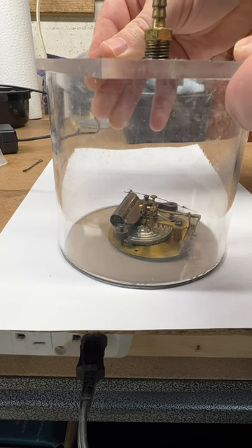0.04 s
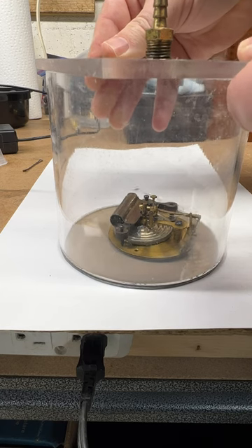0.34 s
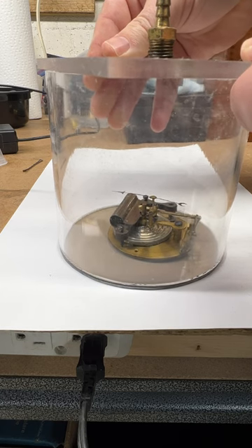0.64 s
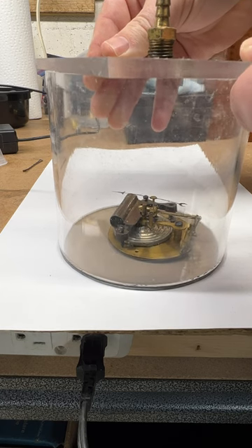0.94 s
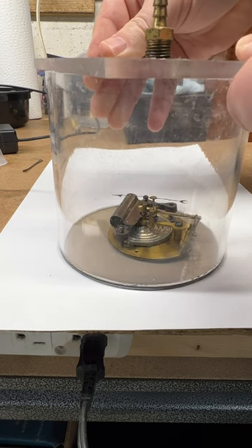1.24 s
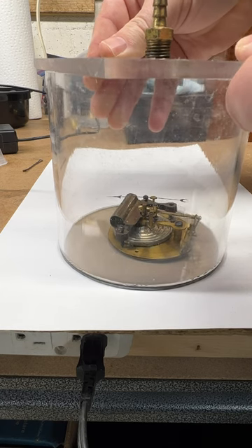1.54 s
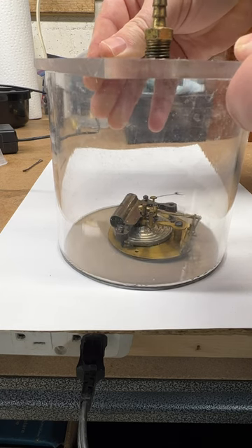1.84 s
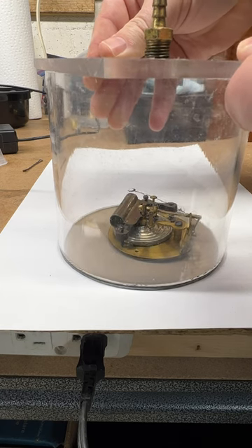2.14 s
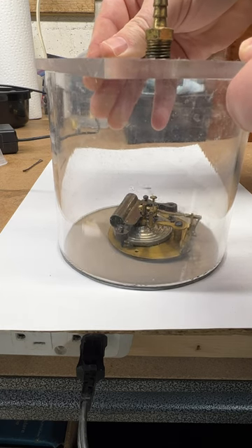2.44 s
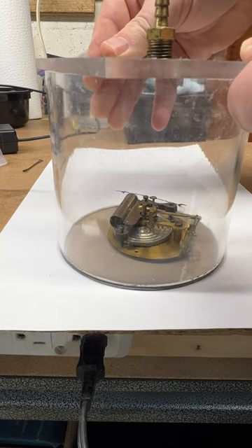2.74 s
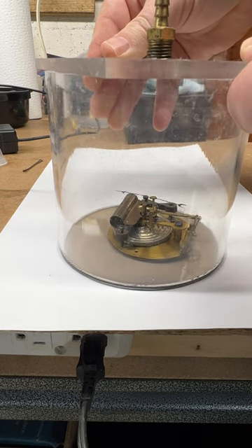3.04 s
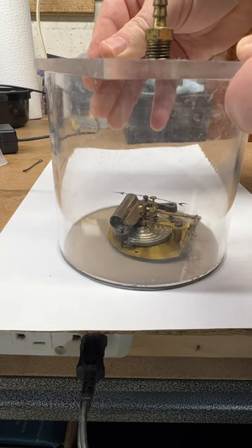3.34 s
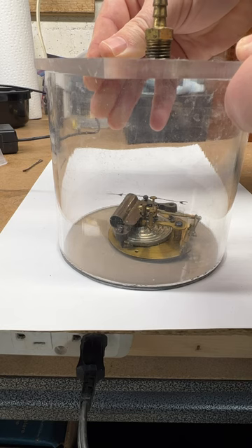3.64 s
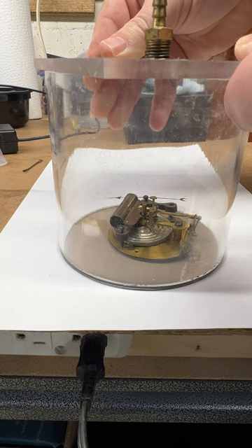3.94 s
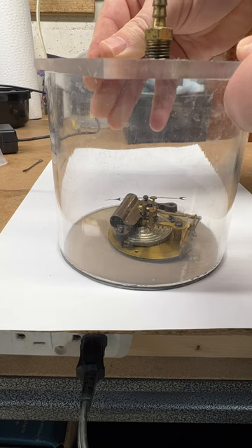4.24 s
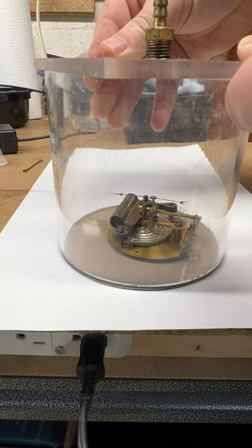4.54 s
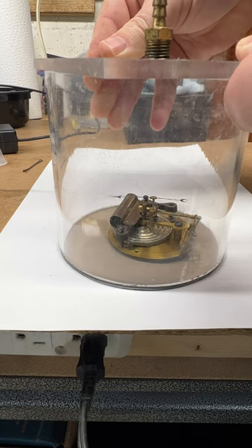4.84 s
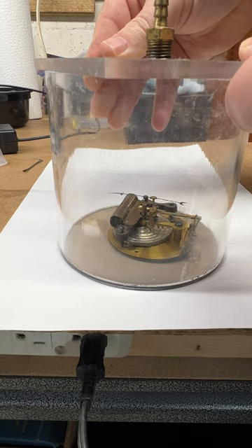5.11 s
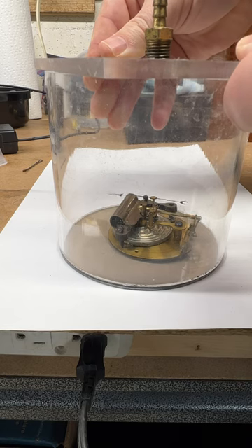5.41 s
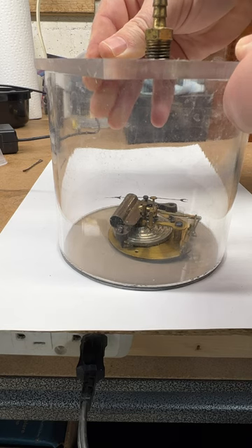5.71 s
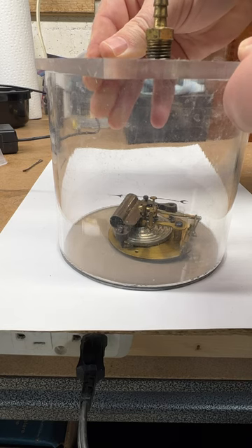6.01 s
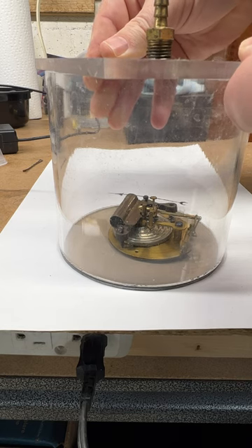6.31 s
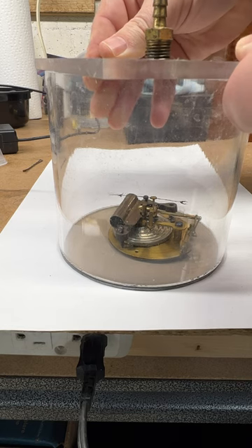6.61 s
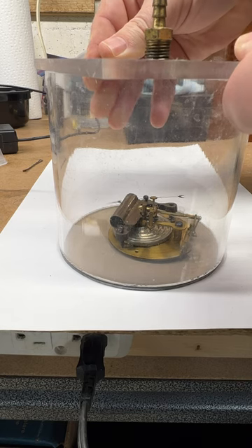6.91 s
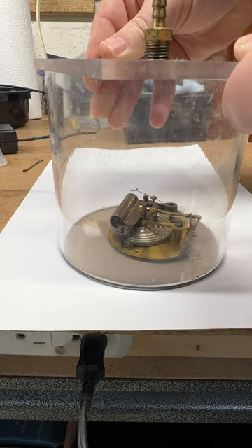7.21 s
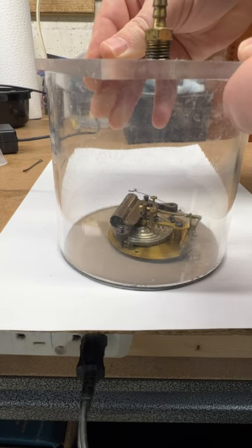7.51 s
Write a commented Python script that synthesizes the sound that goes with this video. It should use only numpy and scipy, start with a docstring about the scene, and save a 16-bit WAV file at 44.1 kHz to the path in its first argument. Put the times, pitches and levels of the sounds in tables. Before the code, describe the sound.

A rotary vacuum pump runs without a break in a small workshop, its low motor drone carrying rapid valve clacks, churning oil and a bright hiss. It starts out labouring and knocking, quickly eases, then strains again with a squelchy rattle around two seconds in. A long, smoother run with a faint thin whistle follows, before the hard knocking returns at the end. The sound is close and fairly dry.

```python
"""A rotary vacuum pump drones in a small workshop, emptying a jar. It opens labouring, dragging a little
and knocking hard, then eases within half a second into its free run: each shaft turn brings pressure
surges, valve clacks and two hissing vane sweeps, over churning oil and a thin whistle that now and then
chirps. The load builds again to 2.2 s, squelching oil and whipping up fizz, and lets go. A light spell
passes at 4.1 s, and a last hard one peaks at 7.2 s and holds to the end."""
import sys
import numpy as np
from scipy import signal
from scipy.fft import rfft, irfft, next_fast_len
from scipy.io import wavfile
from scipy.ndimage import map_coordinates

SR = 44100
rng = np.random.default_rng(int(sys.argv[2]) if len(sys.argv) > 2 else 0)


def unload_audio(sound):
    """Save the sound as a 16-bit wav file, at the path given as the first command line argument."""
    columns = np.transpose(np.atleast_2d(sound))
    # keep every value between -1 and 1, then stretch to whole-number steps
    steps = np.round(np.clip(columns, -1, 1) * 32767)
    wavfile.write(sys.argv[1], SR, steps.astype(np.int16))


N = 333396
FREE_HZ = 29.211  # shaft speed with no load

# pressure surges, negative for suction: (place [turns], free push [relative], labouring push [relative])
PRESSURE_SURGES = [(.22, .8, .65), (.372, -.35, -.4), (.467, -.58, -.8), (.55, -.7, -.8), (.592, .12, .1),
                   (.683, .52, .2), (.825, .27, .3)]
# body of the drone, before gain and tilt: (shaft order, free [dB], part load [dB], labouring [dB])
DRONE_PARTIALS = [(2, -30.0, -30.0, -30.0), (3, -48.5, -49.0, -48.0), (4, -40.0, -44.0, -49.5),
                  (5, -32.5, -33.0, -34.5), (6, -46.0, -39.5, -36.5), (7, -38.0, -41.5, -48.0),
                  (8, -37.5, -34.5, -33.5), (9, -42.0, -34.0, -33.0), (10, -30.0, -29.5, -28.5),
                  (11, -35.5, -42.5, -38.0), (12, -34.5, -33.0, -29.0), (13, -32.5, -34.5, -33.5),
                  (14, -40.5, -38.5, -36.5), (15, -47.5, -46.0, -42.5), (16, -32.0, -31.5, -33.0),
                  (17, -44.0, -42.5, -39.5), (18, -44.0, -43.0, -42.0), (19, -43.5, -42.5, -42.5),
                  (20, -41.0, -43.0, -41.5)]
def drone(turn, load, seat, gain_db=2.5, tilt_db=1.26, flutter=.035, free_chug=.06, hard_chug=.17):
    """Low shaft orders line up into the pressure surges of each turn; the upper ones carry the knock."""
    place, free_push, hard_push = np.transpose(PRESSURE_SURGES)
    chug = free_chug + (hard_chug - free_chug) * load
    knock = seat ** 0.72 * (1 + chug * np.cos(2 * np.pi * (turn - .47)))  # swells towards mid-turn
    body = np.zeros(N)
    for order, *levels_db in DRONE_PARTIALS:
        k = round(order)
        arrival = np.exp(-2j * np.pi * k * place)
        phase = np.angle((1 - load) * (free_push @ arrival) + load * (hard_push @ arrival))
        level = amp(under_load(load, *levels_db) + tilt_db * k / 20)
        level *= 1 + flutter * k / 10 * wobble(30)
        body += level * np.cos(2 * np.pi * k * turn + phase) * (knock if k > 6 else 1)
    return amp(gain_db) * body


def shaft(load, drag_hz=.045, lag_turns=.02, wander_turns=.0012):
    """Turns done so far: load slows the motor and makes the valve open later."""
    return np.cumsum(FREE_HZ - drag_hz * load) / SR - lag_turns * load + wander_turns * wobble(3)


# spells of labouring: (peak time [s], hold [s], build-up time constant [s], load [0-1])
LOAD_SPELLS = [(0, 0.3, 0.48, 0.94), (2.198, 0.17, 0.23, 0.94), (4.082, 0.054, 0.075, 0.25),
               (7.193, 0.44, .19, 0.95)]
def labour(release_s=0.13):
    """The load on the pump, 0-1: in each spell it builds ever faster, holds, then lets go."""
    t = np.arange(N) / SR
    load = np.zeros(N)
    for peak, hold, creep, size in LOAD_SPELLS:
        build = np.exp(np.minimum(t - peak, 0) / creep)
        release = np.clip(1 - (t - (peak + hold)) / release_s, 0, 1)
        load += size * build * release
    return np.clip(load, 0, 1)


# turns where the knock fails, slams or drags: (time [s], accent [dB], delay [turns])
KNOCK_STUMBLES = [(.02, -4, 0), (.09, 1, 0), (.12, -2, 0), (.22, -3, 0), (.29, 1, 0), (.36, -8, .004),
                  (.53, -4, 0), (.94, -3, 0), (1.01, -7, .004), (1.42, -8, .004), (1.66, -9, 0),
                  (1.8, -4, .004), (1.83, -4, 0), (1.97, 4, 0), (2.0, -4, .006), (2.07, -6, .004),
                  (2.14, 2, 0), (2.21, -6, .004), (2.25, -2, 0), (2.28, 1, 0), (2.31, 1.5, 0),
                  (2.42, -2, .008), (2.45, -1, .014), (2.48, -3, .018), (2.62, -3, 0), (3.03, -7, .005),
                  (3.68, -3, .008), (4.09, -7, 0), (4.57, -7, .005), (5.43, -3, 0), (5.77, -2, 0),
                  (6.87, -7, .004), (6.93, -7, .008), (7.0, -5, 0), (7.11, -7, .008), (7.14, -4, .006),
                  (7.24, 1, 0), (7.31, -2, 0), (7.45, -3, 0), (7.48, -2, 0), (7.52, 1, 0)]
def seating(turn, scatter_db=.45, jitter_turns=.0012):
    """Gain and delay [turns] of the mid-turn knock: it varies each turn and now and then stumbles."""
    count = turn.astype(int)
    accent_db, late = rng.standard_normal((2, count[-1] + 1)) * [[scatter_db], [jitter_turns]]
    for time, db, delay in KNOCK_STUMBLES:
        which = count[min(round(time * SR), N - 1)]
        accent_db[which], late[which] = db, delay
    mid_turn = np.exp(-((turn % 1 - .54) / .14) ** 4)
    return amp(accent_db[count] * mid_turn), late[count] * mid_turn


# valve and vane hits, levels relative: (place [turns], free [dB], part load [dB], labouring [dB],
# brightness [dB/octave], timing scatter [turns], level scatter [dB])
CONTACTS = [(.172, -5.5, 2, 2.5, -2.5, .0005, .7), (.387, -20, -8, 2, -8, .001, 1),
            (.465, 1, 1.5, 4, -7, .0015, 1.3), (.53, -8, -6, -3, -8, .003, 1.6),
            (.6, -20, -14, -4, -6, .002, 1.6), (.683, -.5, 0, .5, -5, .001, 1.6)]
# each hit and the light valve's bounce after it: (typical delay [turns], relative level [dB])
BOUNCES = [(0, 0), (.022, -13)]
# ring of the casing: (frequency [Hz], width [Hz], relative level [dB])
CASING_MODES = [(735, 53, 2), (869, 11, 4), (1177, 470, 0), (1410, 80, 0.5), (1627, 97, -5.5),
                (1790, 280, -4.5), (2020, 224, -2), (2640, 310, 1.5), (2995, 40, 2.5)]
def clatter(turn, load, gain_db=-42.0, load_db=-0.5, damping_hz=3200):
    """Loose contacts ring the casing turn after turn and rebound, never quite on time."""
    turns, blows = np.arange(int(turn[-1]) + 1), np.zeros(N)
    for place, free_db, part_db, hard_db, bright_db, jitter, scatter_db in CONTACTS:
        hits = np.zeros(N)
        for delay, bounce_db in BOUNCES:
            late, size, flight = rng.standard_normal((3, len(turns)))
            hit_turns = turns + place + jitter * late + delay * amp(2 * flight)
            at = np.interp(hit_turns, turn, np.arange(N)).astype(int)
            hit_db = under_load(load[at], free_db, part_db, hard_db) + load_db * load[at]
            hits += np.bincount(at, amp(hit_db + bounce_db + scatter_db * size) * (at < N - 1), N)
        blows += filtered(hits, lambda hz: contact_spectrum(0, bright_db, hz))
    # the contact time leaves little above the casing's modes
    casing = lambda hz: resonant(CASING_MODES, hz) / (1 + (hz / damping_hz) ** 6)
    return amp(gain_db) * workshop(filtered(blows, casing))


def contact_spectrum(level_db, bright_db, hz):
    """The tone of one hit: a slope of bright_db per octave through the mids."""
    return amp(level_db + bright_db * np.log2(np.clip(hz, 900, 4000) / 1500))


def squelch(turn, load, gain_db=-31, start_hz=1100, end_hz=2000):
    """Under load trapped oil squeezes past the vane: a quick upward chirp on the mid-turn knock."""
    place, length, jitter = .44, .13, .004  # turns
    count = turn.astype(int)
    late, accent_db = rng.standard_normal((2, count[-1] + 1))
    progress = np.clip((turn % 1 - place - jitter * late[count]) / length, 0, 1)
    cycles = (start_hz * progress + (end_hz - start_hz) * progress ** 2 / 2) * length / FREE_HZ
    envelope = amp(gain_db + accent_db[count]) * load ** 2 * np.sin(np.pi * progress)
    return envelope * np.sin(2 * np.pi * cycles)


# clean tones of rotor and ringing cover: (shaft order, free [dB], part load [dB], labouring [dB])
WHINE_PARTIALS = [(22, -56, -51, -52), (24, -54, -62, -48), (25, -61, -58, -48), (26, -56, -54, -56),
                  (28, -68, -68, -50), (30, -52, -58, -68), (33, -62, -70, -70), (36, -61, -56, -62),
                  (38, -62, -58, -52), (40, -57, -50, -53), (41, -70, -64, -51), (42, -66, -58, -51),
                  (43, -59, -58, -66), (44, -59, -66, -54), (47, -55, -57, -49), (48, -54, -55, -43),
                  (49, -57, -59, -62), (56, -65, -66, -59), (57, -62, -63, -68), (66, -63, -70, -63),
                  (88, -62, -64, -63), (103, -65, -66, -70)]
def whine(turn, load, seat, waver_db=0.5, swell=0.13):
    """Thin tones locked to the shaft ring in step with the contacts that drive them."""
    tones = np.zeros(N)
    for order, *levels_db in WHINE_PARTIALS:
        k = round(order)
        hz = k * FREE_HZ
        drive = sum(contact_spectrum(np.array(hit_db), bright_db, hz) * np.exp(-2j * np.pi * k * place)
                    for place, *hit_db, bright_db, _, _ in CONTACTS)
        phase = under_load(load, *np.unwrap(np.angle(drive * resonant(CASING_MODES, hz))))
        level = amp(under_load(load, *levels_db) + waver_db * wobble(6.2))
        tones += level * np.cos(2 * np.pi * k * turn + phase)
    pulse = seat * (1 + swell * np.cos(2 * np.pi * (turn - .56)))
    return np.sqrt(2) * pulse * tones


# tone curve of the churned oil: (frequency [Hz], relative level [dB])
OIL_SPECTRUM = [(25, -13), (55, -5), (110, -10), (200, -7.5), (330, -2), (470, 0.5), (620, -8),
                (780, -10.5), (1300, -13.5), (1600, -20.5), (2300, -21.5), (2800, -16), (4600, -23),
                (9000, -44)]
def churn(turn, gain_db=-36, depth=0.028, uneven_db=1.5):
    """Churned oil rumbles, swelling slightly with each exhaust stroke."""
    swell = (1 + depth * np.cos(2 * np.pi * (turn - .62))) * amp(uneven_db * wobble(25))
    return amp(gain_db) * noise(lambda hz: amp(along(OIL_SPECTRUM, hz)), swell)


def exhaust(turn, load, gain_db=-45.0, load_db=2, uneven_db=-0.2, place=.78, decay_turns=0.25):
    """Once a turn a puff of air follows the valve and rustles through the casing."""
    envelope = np.exp(-((turn - place) % 1) / decay_turns) * amp(uneven_db * wobble(30))
    puff = noise(lambda hz: resonant(CASING_MODES, hz) / (1 + (hz / 2600) ** 4), envelope)
    return amp(gain_db + load_db * load) * puff


# swishes past the vanes: (place [turns], half width [turns], relative level [dB])
VANE_SWEEPS = [(.135, .04, -20), (.345, .1, -15.8), (.81, .125, -14.8)]
# sheen of the thin metal parts: (frequency [Hz], width [Hz], relative level [dB])
METAL_MODES = [(3820, 80, -15), (4200, 50, -14), (5790, 70, -8), (6060, 100, -9), (6480, 70, -3),
               (6550, 40, 2.5), (6630, 60, -5), (6820, 90, -3), (7240, 100, -12), (7600, 90, -13),
               (7870, 180, -10), (8530, 130, -4), (8650, 80, -8)]
def vanes(turn, gain_db=-44.5, rolloff_hz=9000, uneven_db=0.93):
    """Oil and air hiss past the vanes: a brief brush and two broad sweeps a turn make thin metal sing."""
    sweeps = sum(amp(db) * np.exp(-(((turn - place + .5) % 1 - .5) / width) ** 4)
                 for place, width, db in VANE_SWEEPS)
    metal = lambda hz: resonant(METAL_MODES, hz) / (1 + (hz / rolloff_hz) ** 10)
    return amp(gain_db) * noise(metal, sweeps * amp(uneven_db * wobble(30)))


# tone curve of escaping air: (frequency [Hz], relative level [dB])
AIR_SPECTRUM = [(1500, -37), (2800, -9), (3500, -44), (4150, 5), (4500, -14.5), (5300, -6), (6200, 3),
                (7400, -1), (8600, 0.5), (9600, -7), (10400, -13), (11400, -43)]
def hiss(gain_db=-47):
    """Escaping air lays an even, bright bed."""
    return amp(gain_db) * noise(lambda hz: amp(along(AIR_SPECTRUM, hz)))


def fizz(load, gain_db=-47, centre_hz=8200, width_octaves=0.25, lag_s=0.096):
    """Load whips up foam, whose bright fizz trails just behind it."""
    pole = np.exp(-1 / (lag_s * SR))
    foam = signal.lfilter([1 - pole], [1, -pole], load)
    band = lambda hz: np.exp(-(np.log2(hz / centre_hz + 1e-9) / width_octaves) ** 2)
    return amp(gain_db) * foam * noise(band)


def whistle(load, gain_db=-54, pitch_hz=3805, choke_load=0.078):
    """Air blows a thin, breathy whistle that chokes under load."""
    breath = noise(lambda hz: resonant([(pitch_hz, 95, 0)], hz) ** 2)
    return amp(gain_db) * breath / (1 + load / choke_load)


# chirps of the whistle: (time [s], level [dB])
WHISTLE_CHIRPS = [(.53, -43), (.98, -47), (2.49, -46), (3.03, -50), (4.4, -50)]
def chirps(pitch_hz=3850, waver_hz=35, half_width_s=.016):
    """Now and then the whistle catches for an instant on a clear note."""
    t = np.arange(N) / SR
    envelope = sum(amp(db) * np.exp(-((t - time) / half_width_s) ** 2) for time, db in WHISTLE_CHIRPS)
    cycles = np.cumsum(pitch_hz + waver_hz * wobble(150)) / SR
    return envelope * np.sqrt(2) * np.sin(2 * np.pi * cycles)


# electric hum: (frequency [Hz], level [dB])
HUM_TONES = [(119.3, -49), (103.4, -48.5), (53.2, -48.5)]
def hum():
    """A steady electric hum sits under the pump."""
    t = np.arange(N) / SR
    return np.sqrt(2) * sum(amp(db) * np.sin(2 * np.pi * (hz * t + rng.random())) for hz, db in HUM_TONES)


def workshop(x, room_db=-10, t60_s=0.055):
    """The sound at rms 1 plus the short answer of the walls, different left and right."""
    t = np.arange(SR // 3) / SR
    tail = amp(-60 * t / t60_s) * rng.standard_normal((2, len(t)))
    reflections = signal.fftconvolve(x[None], tail, axes=1)[:, :N]
    return unit(x) + amp(room_db) * spread(reflections, np.ones_like)


# stereo width, before the bass is narrowed: (frequency [Hz], left-right likeness [0-1])
STEREO_LIKENESS = [(200, 0.66), (450, 1), (700, 0.1), (1200, 0.92), (2500, 0.65), (4000, 0.023), (6500, 1),
                   (9000, 0.47)]
def spread(pair, colour):
    """Two unrelated signals become coloured, partly alike stereo of rms 1."""
    def mid_side(hz):
        angle = apart(hz) * np.arccos(np.clip(along(STEREO_LIKENESS, hz), 0, 1)) / 2
        return colour(hz) * np.array([np.cos(angle), np.sin(angle)])
    mid, side = filtered(pair, mid_side)
    return unit(np.array([mid + side, mid - side]))


# stereo balance: (frequency [Hz], left minus right [dB])
PAN_BALANCE = [(200, 0), (300, -1.6), (350, -1.2), (420, -6), (470, -1.5), (580, 1), (750, -6),
               (1300, -4.3), (2500, -4), (4000, -1), (6500, 1), (10000, 0)]
# stereo delay, before the bass is narrowed: (frequency [Hz], left lead [rad])
PAN_PHASE = [(100, 0), (200, -.35), (360, -.45), (410, -1.8), (470, -.3), (560, -1.2), (700, -2.6),
             (950, -5.3), (1380, -5.9), (2580, -6.6), (3500, -8), (5000, -9.4), (5600, -12.5),
             (7400, -12.6), (9000, -13.2)]
def pan(x):
    """Level and phase between the two sides set the pump a little to the right."""
    half = np.array([[.5], [-.5]])
    balance = lambda hz: amp(half * along(PAN_BALANCE, hz))
    lead = lambda hz: apart(hz) * np.angle(np.exp(1j * along(PAN_PHASE, hz)))
    return filtered(x, lambda hz: balance(hz) * np.exp(1j * half * lead(hz)))


def apart(hz):
    """Separation, 0-1: long waves reach both sides alike, short ones do not."""
    return 1 - np.exp(-(hz / 300) ** 2)


def noise(colour, envelope=1):
    """Stereo noise, shaped by an envelope and then coloured, at rms 1."""
    return spread(envelope * rng.standard_normal((2, N)), colour)


def under_load(load, free, part, hard):
    """Crossfade a value from free running through part load to labouring."""
    return np.interp(load, [0, 0.33, 1], [free, part, hard])


def resonant(modes, f):
    """Causal response of resonances: (frequency [Hz], width [Hz], level [dB])."""
    return sum(amp(db) * 1j * f * w / (hz * hz - f * f + 1j * f * w) for hz, w, db in modes)


def filtered(x, response):
    """Filter x by a complex response of frequency."""
    size = next_fast_len(N + SR // 2)
    return irfft(rfft(x, size) * response(np.fft.rfftfreq(size, 1 / SR)), size)[..., :N]


def wobble(rate):
    """A smooth random curve, rate knots a second."""
    return map_coordinates(rng.standard_normal(int(N * rate / SR) + 4), [np.arange(N) * rate / SR])


def along(points, hz):
    """Read a curve of (frequency [Hz], value) points on a log axis."""
    freqs, values = np.transpose(points)
    return np.interp(np.log(hz + 1), np.log(freqs + 1), values)


def amp(db):
    """Decibels to gain."""
    return 10 ** (np.asarray(db) / 20)


def unit(x):
    """Scale to rms 1."""
    return x / np.sqrt(np.mean(x ** 2) + 1e-20)


def scene():
    """One shaft and its load drive the pump: knocks in front, tones, air and oil behind."""
    load = labour()
    turn = shaft(load)
    seat, late = seating(turn)
    knock_turn = turn - late
    body = drone(knock_turn, load, seat)
    knocks = seat * (clatter(knock_turn, load) + squelch(knock_turn, load))
    tones = whine(turn, load, seat) + hum()
    air = exhaust(turn, load) + vanes(turn) + hiss() + fizz(load) + whistle(load) + chirps()
    return pan(body + knocks + tones + air + churn(turn))


def record(dry, top_hz=11750):
    """A brick-wall high cut takes off the very top."""
    return filtered(dry, lambda hz: hz < top_hz)


dry = scene()
out = record(dry)
unload_audio(out)
```